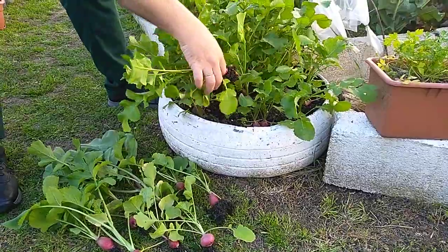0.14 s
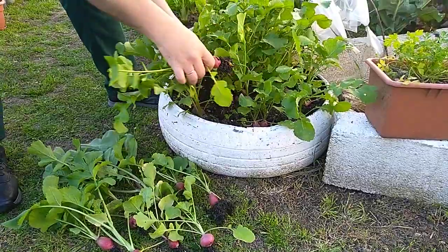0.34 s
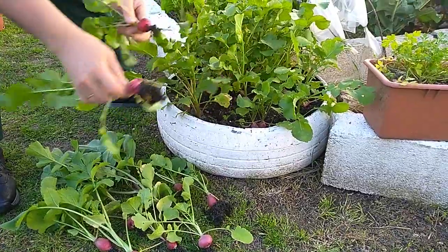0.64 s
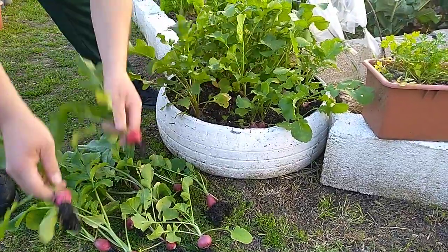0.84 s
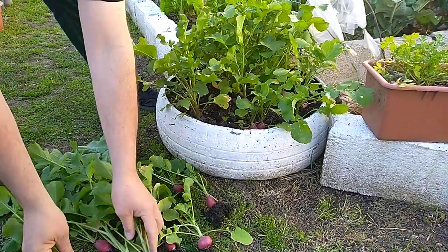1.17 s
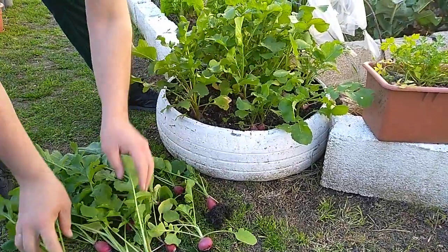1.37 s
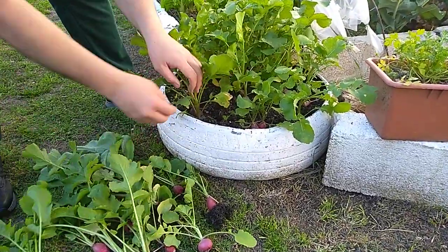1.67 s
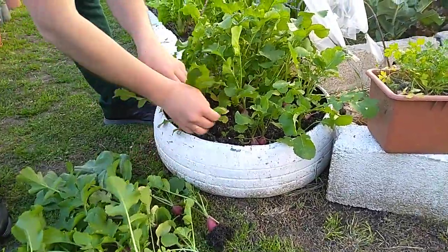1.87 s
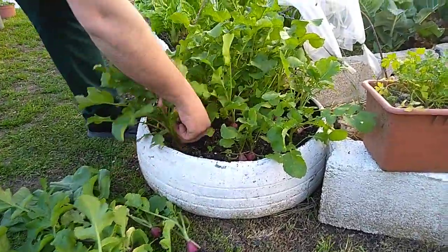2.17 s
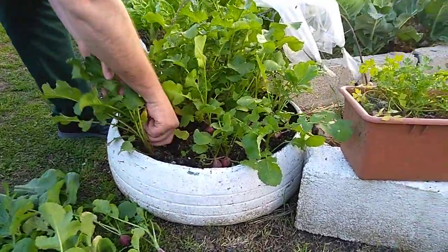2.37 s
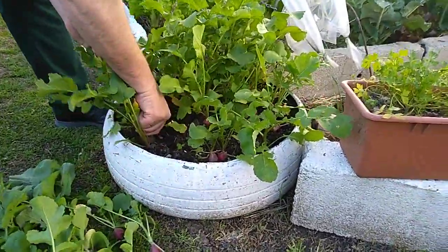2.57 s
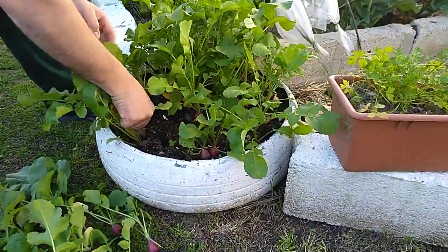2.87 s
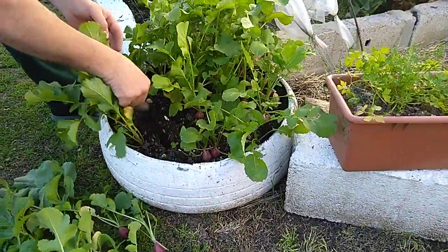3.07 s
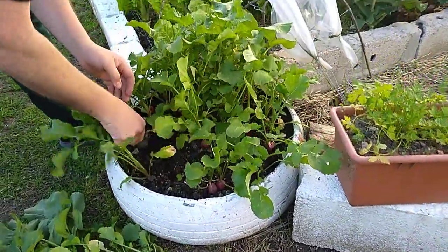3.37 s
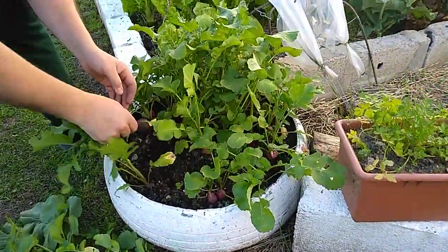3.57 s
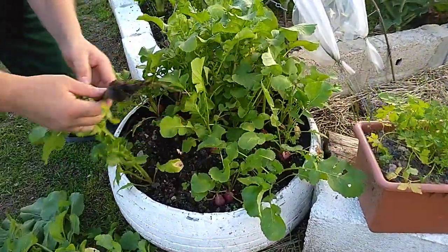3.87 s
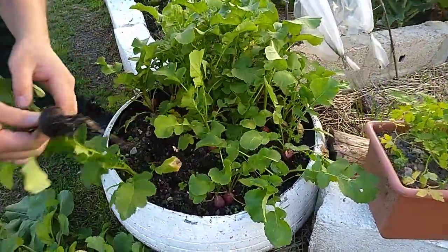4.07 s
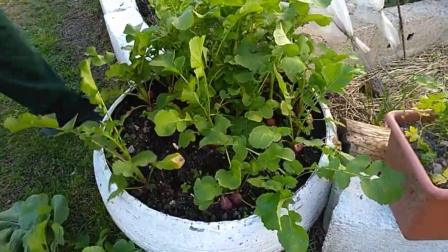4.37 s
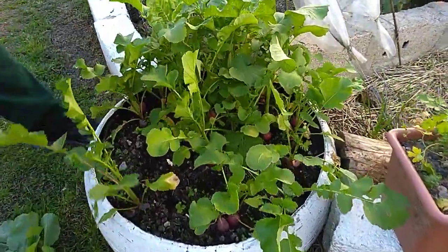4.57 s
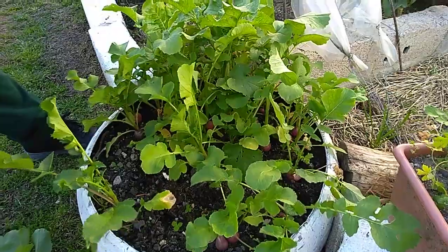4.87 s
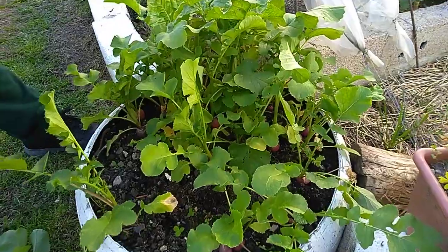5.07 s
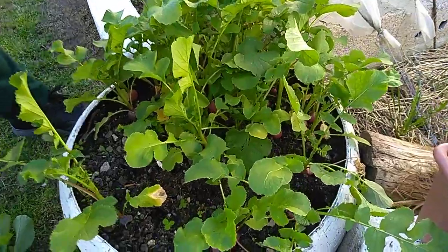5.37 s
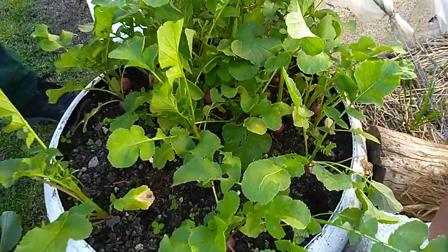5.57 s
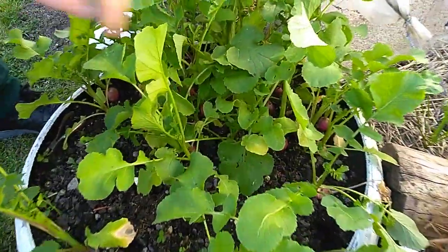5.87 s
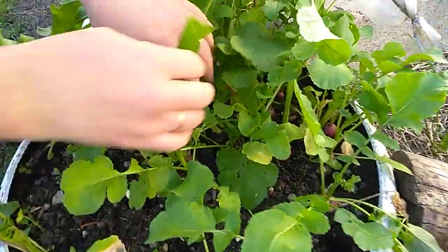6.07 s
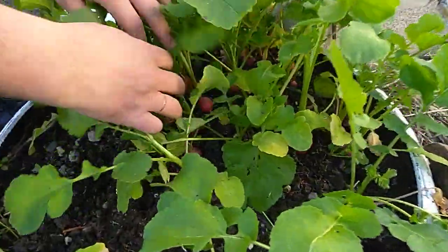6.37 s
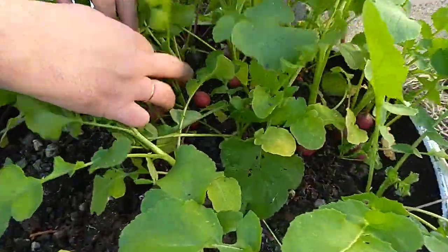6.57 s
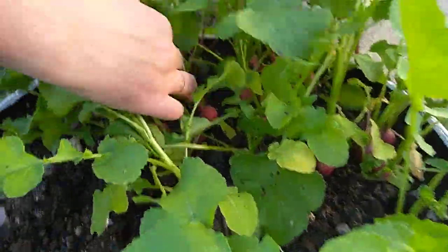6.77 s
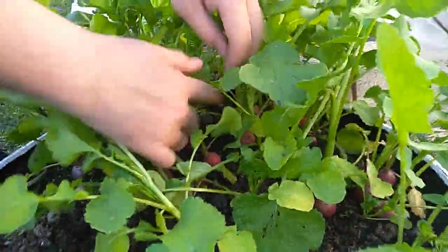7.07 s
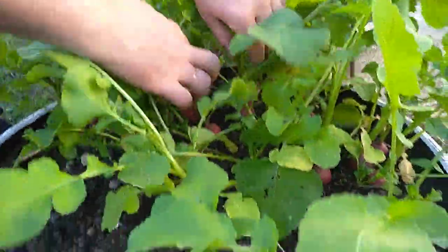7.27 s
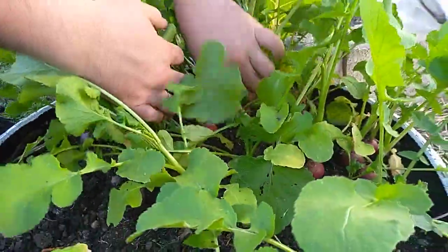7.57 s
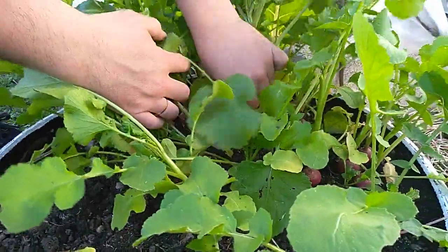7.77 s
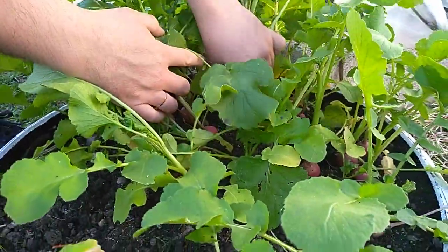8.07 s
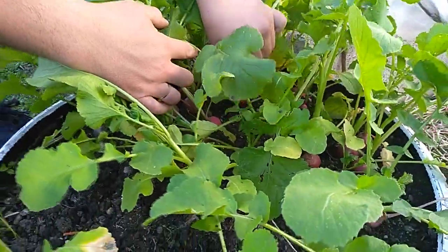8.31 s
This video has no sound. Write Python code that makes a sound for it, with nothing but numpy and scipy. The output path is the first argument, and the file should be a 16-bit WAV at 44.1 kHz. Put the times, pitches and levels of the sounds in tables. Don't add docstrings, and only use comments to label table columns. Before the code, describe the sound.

Close bright leaf rustling and sharp root snaps, growing denser in the second half, with muffled handling thumps and a final hollow knock.

```python
import sys
import numpy as np
from scipy import signal
from scipy.io import wavfile

SR = 44100
rng = np.random.default_rng(int(sys.argv[2]) if len(sys.argv) > 2 else 0)


def field_ratio(decibels):
    return 10 ** (np.asarray(decibels, dtype=float) / 20)


def generate_wav(signal):
    frames = np.transpose(np.atleast_2d(signal))
    scaled = np.clip(frames, -1, 1) * 32767
    pcm = np.round(scaled).astype(np.int16)
    wavfile.write(sys.argv[1], SR, pcm)


N = 372204
TIME = np.arange(N) / SR


def rms_one(x):
    return x / np.sqrt(np.mean(x ** 2) + 1e-20)


def in_time(rows):
    s, *columns = np.transpose(rows)
    return [np.interp(TIME, s, c) for c in columns]


def at_hz(points, hz):
    point_hz, value = np.transpose(points)
    return np.interp(np.log(hz), np.log(np.maximum(point_hz, 1)), value)


def drift(rate_hz):
    r = np.exp(-80 * np.pi * rate_hz / SR)
    slow = signal.lfilter([1], [1, -2 * r, r * r], rng.standard_normal(N // 40 + 2002))[2000:]
    return np.interp(np.arange(N) / 40, np.arange(len(slow)), rms_one(slow))


def band(x, low_hz, high_hz):
    sos = signal.butter(2, [low_hz, min(high_hz, .45 * SR)], "band", fs=SR, output="sos")
    return signal.sosfilt(sos, x)


def sides(pan_db):
    return field_ratio(np.array([pan_db / 2, -pan_db / 2]))


def fade(start, stop, edge):
    return np.clip(np.minimum(TIME - start, stop - TIME) / edge, 0, 1)


def swells(rows, extra_db=0):
    s, peak_db, rise, fall = np.transpose(rows)[:4, :, None]
    since = TIME[::40] - s
    away = np.where(since < 0, -since / np.maximum(rise, .002), since / np.maximum(fall, .002))
    level_db = peak_db + np.reshape(extra_db, (-1, 1)) - 38.5 * away ** 1.254
    power = field_ratio(level_db) ** 2
    return np.interp(TIME, TIME[::40], np.sqrt(power.sum(axis=0)) + 1e-9)


def crackle(per_s, spread_db, smooth):
    chance, noise = rng.random((4, N)), rng.standard_normal((4, N))
    rarity = np.maximum(chance * SR / per_s, .007)
    sizes = rarity ** (-spread_db * np.log(10) / 20) * np.sign(noise)
    clicks = sizes * (chance < per_s / SR)
    return rms_one(clicks) + smooth * noise


# (pitch [Hz], level [dB per Hz])
GARDEN_COLOUR = [(15, -37), (25, -26), (53, 10.5), (108, 7), (293, -3.5), (1370, -12.5), (2350, -16.5),
                 (3500, -24), (5280, -29), (7110, -28), (11000, -25), (13500, -32), (16000, -55)]
# (pitch [Hz], likeness [0 to 1])
LIKENESS = [(60, 0.97), (180, 0.87), (550, 0.54), (1650, 0.0), (4970, 0.7), (15000, 0.79)]
# (pitch [Hz], level [dB rms])
ENGINE_TONES = [(121, -69), (177, -74.5)]
# (start [s], end [s])
ENGINE_SPANS = [
    (2.41, 4.92),
    (6.0, 7.18),
]


def garden():
    out, edges, white = 0, np.geomspace(25, 16000, 20), rng.standard_normal((2, 2, N))
    for k, (low, high) in enumerate(zip(edges, edges[1:])):
        hz = np.sqrt(low * high)
        mid, side = band(white[k % 2], low, high)
        alike = np.clip(at_hz(LIKENESS, hz), 0, 1)
        sway_db = 2.2 * drift(2.65)
        gain = field_ratio(at_hz(GARDEN_COLOUR, hz) + sway_db)
        out = out + gain * (np.sqrt(1 + alike) * mid + np.sqrt(1 - alike) * side * [[1], [-1]])
    waver, hum = field_ratio(.15 * drift(4)), 0
    for hz, level_db in ENGINE_TONES:
        throb_db = 3.5 * drift(2.4)
        hum = hum + field_ratio(level_db + throb_db) * np.sin(2 * np.pi * np.cumsum(hz * waver) / SR)
    audible = sum(fade(start, stop, 0.092) for start, stop in ENGINE_SPANS)
    return field_ratio(-67) * rms_one(out) + audible * hum


# (time [s], level [dB])
TRAFFIC_SWELL = [(0.0, -58.5), (0.61, -67), (0.87, -90), (1.4, -55), (1.6, -62.5), (2.52, -69.5),
                 (3.2, -72), (4.14, -62), (4.4, -81), (5.66, -62), (5.9, -70), (6.5, -57.5), (6.7, -54),
                 (7.01, -66), (7.45, -70), (7.71, -42), (7.86, -41.5), (8.05, -69), (8.44, -59.5)]


def traffic():
    noise = band(band(rng.standard_normal(N), 35, 104), 42, 202)
    rumble = noise * field_ratio(3.5 * drift(6.9))
    return field_ratio(in_time(TRAFFIC_SWELL)[0]) * rms_one(rumble)


# (time [s], peak [dB], rise [s], fall [s], pitch [Hz])
SOIL_LUMPS = [(.04, -74, 0.33, 0.7, 3040), (.16, -68, .15, 0.091, 404), (.57, -60, 0.029, 0.046, 2500),
              (.73, -78, 0.02, 0.018, 2590), (1.1, -65, 0.073, 0.21, 2920), (1.35, -69, 0.025, 0.062, 2320),
              (1.45, -77.5, 0.17, 0.14, 680), (1.68, -60.5, 0.073, 0.42, 2190), (1.7, -62, .05, 0.27, 354),
              (1.701, -55.5, 0.066, 0.24, 880), (1.86, -68, 0.13, 0.21, 710),
              (2.011, -64.5, 0.022, 0.031, 280), (2.12, -76, 0.044, .05, 500), (2.33, -66, .06, 0.36, 354),
              (2.43, -69.5, 0.19, 0.13, 537), (2.66, -70, 0.11, 0.12, 262), (2.79, -70, 0.03, 0.033, 2520),
              (2.95, -68, 0.054, 0.37, 710), (3.055, -52.5, 0.0054, 0.012, 1000),
              (3.28, -74, 0.074, 0.18, 980), (3.5, -79, 0.14, 0.53, 550), (4.1, -74, 0.24, 0.33, 594),
              (4.4, -68.5, 0.24, 0.15, 666), (4.65, -74.5, 0.075, 0.17, 756), (4.86, -72, .1, .3, 906.5),
              (5.43, -63, 0.0048, 0.014, 1450), (5.449, -60, .015, 0.073, 3500),
              (5.59, -57, 0.11, 0.091, 800), (5.788, -66, 0.27, 0.17, 3204),
              (6.001, -67, 0.017, 0.031, 394), (6.039, -69, 0.15, 0.034, 980),
              (6.279, -67, 0.37, 0.24, 524), (6.56, -78, .18, 0.13, 600), (6.93, -68, 0.066, 0.21, 700),
              (7.3, -81, 0.21, .2, 604), (7.64, -69, 0.12, 0.31, 500), (8.098, -68.5, 0.042, 0.042, 1224),
              (8.416, -49.5, 0.0082, 0.016, 601)]


def soil():
    grains = crackle(1500, spread_db=6.0, smooth=0.7)[:3]
    edges, out = np.geomspace(240, 4400, 10), 0
    for low, high in zip(edges, edges[1:]):
        octaves_off = np.log2(np.sqrt(low * high) / np.array(SOIL_LUMPS)[:, -1])
        level = swells(SOIL_LUMPS, -19 * octaves_off ** 2)
        out = out + level * rms_one(band(grains, low, high))
    return 0.66 * (out[0] + 2.02 * out[1:])


# (time [s], peak [dB], rise [s], fall [s], buffeting [dB re peak])
BUMPS = [(0.052, -49.5, 0.045, 0.18, 1.5), (.215, -41.5, 0.52, 0.11, -12.5), (.382, -47, 0.19, 0.29, -9),
         (5.518, -16, 0.0047, 0.21, -8), (5.562, -23, 0.021, 0.3, -3.5), (5.64, -30, 0.072, 0.066, 4),
         (5.7, -23, 0.13, 0.037, -30), (6.148, -63, 0.025, 0.29, 12), (6.244, -60.5, 0.12, 0.035, 13.5),
         (6.338, -42, 0.042, 0.16, -22), (6.49, -25, 0.0062, 0.19, -19), (6.54, -39, 0.054, 0.15, 7),
         (6.662, -30, 0.08, 0.02, -7), (7.278, -21.5, 0.0074, 0.094, -12), (7.296, -39, 0.032, 0.28, 1.5),
         (7.392, -30, 0.12, 0.5, -6.5), (7.637, -32, 0.071, 0.22, 3), (7.82, -32, 0.57, 0.83, -41),
         (7.962, -41.5, 0.2, 0.049, -9), (8.146, -40.5, 0.037, 0.11, -16), (8.26, -48, 0.3, 0.18, -42),
         (8.412, -35.5, 0.03, 0.12, 2.5)]
# (time [s], flutter pitch [Hz])
FLUTTER_PITCH = [(0, 53.5), (.254, 57.8), (.294, 69.3), (.4, 74.2), (5.5, 106.8), (5.56, 105.7),
                 (5.64, 94.3), (5.7, 84.6), (6.15, 122.8), (6.35, 120.7), (6.5, 111.4), (6.7, 116),
                 (7.27, 89.7), (7.39, 75.7), (7.68, 72.46), (7.85, 77.35), (8.22, 76), (8.41, 83.9)]


def grip():
    wander, lumps = field_ratio(.4 * drift(17.1)), field_ratio(1.8 * drift(34))
    buffet, apart = rng.standard_normal((2, N))
    buffet = rms_one(band(band(buffet, 87, 357), 83, 174.4))
    apart = rms_one(band(apart, 98, 215))
    phase = 2 * np.pi * np.cumsum(in_time(FLUTTER_PITCH)[0] * wander) / SR
    flutter = 0.41 * np.sin(phase + 0.21 * np.sin(phase))
    level = swells(BUMPS)
    buffet_level = swells(BUMPS, np.array(BUMPS)[:, -1] - 4.0)
    mid = level * flutter + buffet_level * 1.47 * np.tanh(buffet / 2.12)
    return lumps * (mid * sides(1.6)[:, None] + 0.033 * level * apart * [[1], [-1]])


# (time [s], pitch [Hz])
HOLLOW_PITCH = [(0, 4430), (2.5, 4600), (3.0, 3900), (4.25, 3700), (4.4, 5300), (5.3, 5076), (5.5, 3500),
                (5.9, 4700), (6.5, 4830), (6.7, 3340), (6.9, 4540), (7.3, 4400), (7.6, 3472), (8.44, 4990)]


def hollow(hz):
    octaves_off = np.log2(hz / in_time(HOLLOW_PITCH)[0])
    return -5 * np.exp(-(octaves_off / .2) ** 2)


# (pitch [Hz], left minus right [dB])
PORT_COLOUR = [(900, 4), (2400, 0), (4400, 0), (8120, 5), (15000, 15)]


def coloured(source, spectrum, patchy_db, speed, shared, tilt_db=0):
    low, high = spectrum[0][0], spectrum[-1][0]
    edges = np.geomspace(low, high, int(3 * np.log2(high / low)) + 2)
    out, share = 0, np.clip(shared, 0, 1)
    for k, (a, b) in enumerate(zip(edges, edges[1:])):
        first_row = 2 * (k % 2)
        both, own = band(source[first_row:][:2], a, b)
        hz = np.sqrt(a * b)
        left = np.roll(np.sqrt(share) * both + np.sqrt(1 - share) * own, 6)
        pair = np.array([left, both])
        flicker_db = patchy_db * drift(speed)
        level_db = at_hz(spectrum, hz) + flicker_db + hollow(hz) + tilt_db * np.log2(hz / 9000)
        out = out + field_ratio(level_db) * sides(at_hz(PORT_COLOUR, hz))[:, None] * pair
    return rms_one(out)


# (time [s], peak [dB], rise [s], fall [s],
# pressure as dull body [dB re rustle])
LEAF_STROKES = [(0.12, -64, 0.2, 0.5, -12), (.3, -71, 0.07, 0.62, -21), (.465, -52.5, 0.07, 0.17, -17),
                (.53, -48.5, 0.18, 0.24, -18), (.67, -58.5, 0.24, 0.11, -18), (.98, -71, 0.033, 0.084, -23),
                (1.06, -56, 0.16, .12, -13), (1.16, -49, 0.23, 0.31, -28), (1.32, -53.5, 0.15, 0.14, -29),
                (1.6, -62, 0.042, .1, -46), (1.67, -57, 0.042, 0.086, -22), (1.75, -43.5, 0.22, 0.38, -26),
                (1.92, -52, 0.092, 0.56, -44), (2.03, -65, .12, 0.18, -34), (2.16, -48, 0.32, 0.23, -25),
                (2.38, -56, 0.18, 0.15, -13.5), (2.475, -42.5, 0.2, 0.18, -39), (2.55, -49.5, 0.11, 0.24, -37),
                (2.69, -59.5, 0.037, 0.064, -19), (2.745, -54, 0.11, 0.1, -46), (2.8, -54.5, 0.11, 0.13, -34),
                (3.02, -53, 0.044, .1, -28), (3.065, -42.5, 0.048, 0.15, -23), (3.14, -40.5, 0.18, 0.19, -24),
                (3.29, -59.5, 0.35, 0.36, -24), (3.665, -57, 0.18, 0.73, -23), (3.95, -37, 0.09, 0.54, -24),
                (4.09, -35.5, 0.084, 0.15, -26), (4.185, -32, 0.066, 0.27, -40), (4.25, -36, 0.13, 0.14, -19.5),
                (4.36, -51, .1, 0.094, -32), (4.565, -57.5, 0.095, 0.27, -28), (4.82, -52.5, 0.023, 0.15, -13.5),
                (4.89, -39, 0.15, 0.24, -45), (5.03, -70.5, 0.19, 0.28, 0.5), (5.175, -45.5, 0.028, 0.038, -19),
                (5.29, -51, 0.048, 0.062, -15), (5.455, -46, 0.028, 0.21, -19),
                (5.525, -31.5, 0.034, 0.09, -10.5),
                (5.605, -33.5, 0.22, 0.16, -8.5), (5.698, -43.5, 0.13, 0.06, -14),
             (5.78, -63, 0.15, 0.081, -21), (5.96, -71.5, 0.015, 0.064, -20), (6.02, -43, 0.08, 0.098, -22),
             (6.1, -48, 0.12, 0.38, -29), (6.194, -38, 0.2, 0.3, -30), (6.26, -38.5, 0.67, 0.18, -15.5),
             (6.35, -37.5, 0.29, 0.33, -33), (6.41, -39, 0.12, 0.12, -11), (6.492, -35.5, 0.15, 0.25, -22),
             (6.542, -34, 0.097, 0.043, -13), (6.585, -33.5, 0.044, 0.32, -22), (6.7, -40, 0.26, 0.88, -38),
             (6.84, -35.5, 0.14, 0.27, -36.5), (6.928, -35, 0.23, 0.14, -20.5),
             (6.97, -36, 0.14, 0.42, -36), (7.074, -33.5, 0.071, 0.24, -25),
             (7.142, -39, 0.13, 0.33, -21.5), (7.21, -33.5, 0.26, 0.28, -35), (7.28, -29, 0.21, 0.11, -27),
             (7.34, -38.5, 0.061, 0.11, -18.5), (7.42, -42, 0.28, 0.78, -24.5),
             (7.495, -38, 0.066, 0.2, -37), (7.55, -47, 0.12, .1, -19), (7.606, -43.5, 0.055, 0.26, -29),
             (7.66, -48, 0.16, 0.28, -11.5), (7.72, -45.5, 0.2, 0.36, -23), (7.81, -68, .15, 0.42, -4),
             (8.1, -62.5, 1, 1, -21), (8.36, -56.5, 0.3, 0.45, -23), (8.43, -40.5, 0.033, .1, -21)]
# (time [s], left
# minus right [dB], brightness [dB])
HANDS = [(0, -1, 1), (.5, -4.5, -0.5), (.7, -2, -4), (1.15, -5, -1.5), (1.36, -11, -1.5),
         (1.7, -7.5, -1.5), (1.95, -1.5, -1), (2.16, -7, -2), (2.45, -7, -1), (2.78, -14.5, -2),
         (3.1, -4.5, -1), (3.65, -21, 1.5), (3.95, -8, -0.5), (4.35, -8, -1.5), (4.6, -25, 2.5),
         (4.9, -12.5, -2), (5.45, -7.5, -0.5), (5.7, -12, 0),
         (5.97, -7.5, -1), (6.05, -6, -0.5), (6.19, -4, -0.5), (6.35, -7, -0.5), (6.53, -5.5, -0.5),
                (6.6, -8, 0.5), (6.8, -7, 1), (7.0, -7.5, -1), (7.2, -7.5, 0.5), (7.3, -4.5, -1),
                (7.48, 5, 0.5), (7.54, -4, -1), (7.6, 3.5, -1), (7.69, 3.5, 1), (7.78, 5.5, 0.5),
                (7.92, -4.5, -1.5), (8.44, -4, -2)]
# (time [s], level [dB], dying time [s])
TEARS = [(0.448, -52, 0.039), (1.58, -54, 0.0056), (2.713, -79, 0.046), (3.857, -44, 0.03),
         (3.913, -44, 0.037), (4.165, -71, 0.033), (5.176, -72, 0.0052), (5.439, -72, 0.031),
         (5.94, -62, 0.035), (5.991, -40, 0.031), (8.411, -43.5, 0.048)]
# (pitch [Hz], level [dB per Hz])
RUSTLE_COLOUR = [(1760, -13), (2800, -11.5), (3600, -9.5), (4600, -6.5), (5960, -1.5), (9730, 3),
                 (13900, -0.5), (16000, -13)]
# (pitch [Hz], level [dB per Hz])
BODY_COLOUR = [(900, -19), (1250, -8), (1600, -2), (2000, 0), (2500, -6), (3300, -18)]


def leaves():
    strokes = LEAF_STROKES
    pan_db, dry_db = in_time(HANDS)
    level = swells(strokes)
    body = swells(strokes, np.array(strokes)[:, -1]) / level
    top_db = dry_db - 0.064 * (20 * np.log10(body) + 21.5)
    for s, tear_db, dying in TEARS:
        i = round(s * SR)
        since = TIME[i:] - s
        level[i:] += field_ratio(tear_db) * np.exp(-since / dying) * (1 - np.exp(-since / .002))
    slips = (rng.random(N) < 160 / SR) * rng.exponential(1, N)
    clumps = 1 + .11 * signal.lfilter([1], [1, -np.exp(-1 / (.006 * SR))], slips)
    grains = crackle(5000 * field_ratio(1.6 * drift(25)), spread_db=4.8, smooth=0.6)
    bright = coloured(grains, RUSTLE_COLOUR, patchy_db=2.2, speed=22, shared=0.05, tilt_db=2.68 * top_db)
    dull = coloured(grains, BODY_COLOUR, patchy_db=1.3, speed=14, shared=0.02)
    return level * sides(pan_db) * (rms_one(clumps) * bright + body * dull)


# (time [s], peak [dB], pitch [Hz], dull part [dB re peak],
# left minus right [dB])
SNAPS = [(0.459, -38, 13800, -33, 9), (.525, -36, 7850, -25, -5), (0.728, -53, 3000, -6, -4),
         (0.968, -50.5, 11400, -26, -4), (1.035, -43, 11600, -16, -1), (1.11, -38, 11100, -18, 0.0),
         (1.577, -42, 9650, -41, 2), (1.639, -45, 11600, -27, -7), (1.83, -42, 11000, -30, 0.0),
         (1.849, -40, 9900, -27, -3), (2.457, -35, 11000, -30, 7), (2.478, -34.5, 10500, -34, 2),
         (2.494, -29.5, 10900, -32, 5), (2.677, -46, 14200, -18, 4), (2.714, -36, 15700, -33, 12),
         (2.7246, -41, 8600, -36, -9), (3.139, -31, 8900, -23, -8), (3.714, -38.5, 7860, -36, -9),
         (3.861, -38, 12820, -34, 11), (3.918, -33, 8200, -35, -8), (3.9753, -29, 8600, -31, 9),
         (5.178, -37.5, 8500, -29, -13), (5.4386, -39.5, 6840, -16, -10), (5.9425, -43, 8400, -30, -6),
         (5.974, -55, 6800, -23, -16), (5.992, -32, 7900, -29, -13), (6.0745, -35, 8390, -36, -8),
         (6.134, -35, 10200, -39, 13), (6.1886, -26, 10300, -38, 11), (6.448, -24.5, 10000, -49, -4),
         (6.535, -20, 10400, -33, -3), (6.5744, -23.5, 8450, -21, -7), (6.698, -28, 9100, -30, -3),
         (7.3274, -31, 11600, -33, 8), (7.6611, -46, 10300, -31, 3), (7.6921, -20, 13700, -29, 15.5),
         (8.408, -38.5, 4400, 0.5, -7.5),
         (1.512, -59, 10360, -53, -7), (1.686, -38, 12000, -32, 0.0), (3.052, -38, 9000, -13, -13),
             (3.655, -40, 8600, -28, -4), (3.929, -30, 11000, -30, 3), (3.953, -37, 10100, -25, 3),
             (4.179, -31, 10000, -35, 0.0), (4.186, -26.5, 9900, -23, -8), (4.308, -41.5, 2940, -15, -11),
             (4.537, -49.5, 8900, -32, -15), (6.204, -24, 10400, -36, -2), (6.404, -28.5, 9500, -28, 2),
             (6.844, -30, 9500, -30, 2), (8.08, -63, 8850, -18, 30)]


def snaps():
    out, after = np.zeros((2, N)), np.arange(int(.03 * SR)) / SR
    events = SNAPS
    noise = rng.standard_normal((len(events), 2, len(after)))
    envelope = np.exp(-after / .002) * (1 - np.exp(-after / .0007))
    for (s, peak_db, hz, dull_db, pan_db), burst in zip(events, noise):
        burst = burst * envelope
        crack = band(burst, hz * 0.82, hz * 1.25)
        tick = band(burst, 1200, 2800)
        sound = crack / np.abs(crack).max() + field_ratio(dull_db) * tick / np.abs(tick).max()
        placed = field_ratio(peak_db + 3.0) * sides(pan_db)[:, None] * sound
        i = round(s * SR)
        out[:, i:i + len(after)] += placed[:, :N - i]
    return out


# (time [s], pitch [Hz], level [dB])
DOVE_COOS = [
    [(0.52, 442, -70), (0.558, 458, -56), (0.676, 474, -65), (0.764, 460, -73), (0.8, 458, -101)],
    [(3.45, 418.4, -100), (3.494, 470, -66), (3.532, 475, -75), (3.652, 415, -72), (3.7, 453, -82)],
]


def dove():
    out, husk = np.zeros(N), rms_one(band(rng.standard_normal(N), 494, 576))
    throb = 1 + 0.47 * np.sin(2 * np.pi * 15.3 * (TIME - .545))
    for coo in DOVE_COOS:
        hz, level_db = in_time(coo)
        unsteady_hz = hz * field_ratio(0.099 * drift(23))
        note = throb * np.sin(2 * np.pi * np.cumsum(unsteady_hz) / SR) + 0.32 * husk
        out += fade(coo[0][0], coo[-1][0], 0.0083) * field_ratio(level_db) * note
    return out * sides(-7.0)[:, None]


# (time [s], length [s], peak [dB], first pitch [Hz], last
# pitch [Hz], left minus right [dB])
GLIDING_TONES = [
    (0.557, 0.02, -53, 2400, 2650, -19),
    (0.687, 0.17, -77, 1970, 1880, 8),
    (0.802, 0.079, -76, 1450, 1420, 20),
    (0.953, 0.13, -74, 1135, 1570, 4),
    (1.34, 0.035, -72, 1770, 1710, -12),
    (1.676, 0.058, -58, 368, 340, 2),
    (3.663, 0.18, -69.5, 1990, 1950, 3),
    (7.612, 0.031, -52.5, 1635, 1730, -21.5),
    (7.626, 0.031, -51, 1094, 850, -6),
]


def squeaks():
    out, unsteady = 0, field_ratio(0.33 * drift(80))
    for s, length, peak_db, first_hz, last_hz, pan_db in GLIDING_TONES:
        hz = np.interp(TIME, [s, s + length], [first_hz, last_hz]) * unsteady
        swell = np.sin(np.pi / 2 * fade(s, s + length, length / 2)) ** 2
        tone = np.sin(2 * np.pi * np.cumsum(hz) / SR)
        out = out + field_ratio(peak_db) * swell * tone * sides(pan_db)[:, None]
    return out


def ring(clicks, hz, t60):
    r, w = field_ratio(-60 / (t60 * SR)), 2 * np.pi * hz / SR
    return signal.lfilter([0, np.sin(w)], [1, -2 * r * np.cos(w), r * r], clicks + 1e-18)


# (pitch [Hz], level [dB], time to fall 60 dB [s])
BODY_TONES = [(385, -14, 0.024), (694, -5, 0.015), (1000, -18, 0.017), (1640, -40, 4.3), (2520, -52, 0.22)]


def knock():
    click = np.zeros(N)
    click[round(8.4075 * SR)] = field_ratio(-22)
    return sum(field_ratio(level_db) * ring(click, hz, t60) for hz, level_db, t60 in BODY_TONES)


def scene():
    hands = leaves() + snaps() + squeaks() + soil()
    return hands + grip() + knock() + dove() + traffic() + garden()


def roll_off(x):
    return signal.sosfilt(signal.butter(12, 15750, fs=SR, output="sos"), x)


def record(dry):
    low_pass = signal.cheby2(10, 40, 16300, fs=SR, output="sos")
    mix = signal.sosfilt(low_pass, dry)
    return roll_off(mix)


dry = scene()
out = record(dry)
generate_wav(out)
```